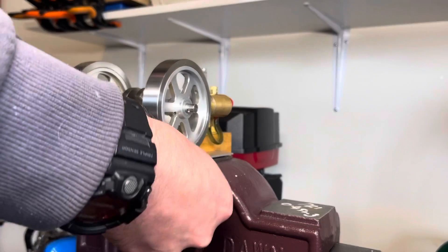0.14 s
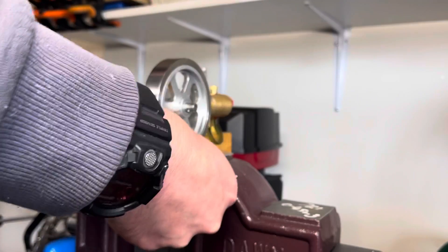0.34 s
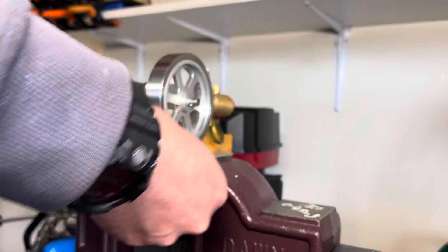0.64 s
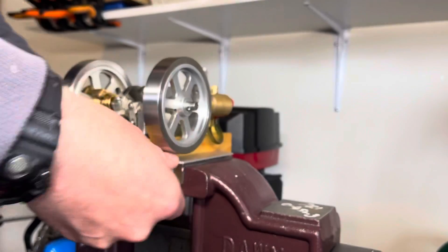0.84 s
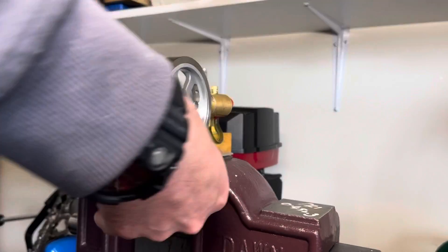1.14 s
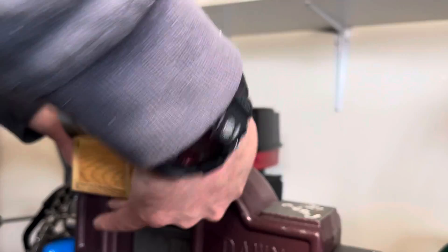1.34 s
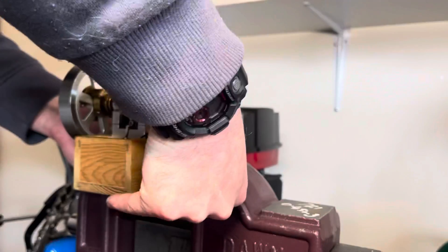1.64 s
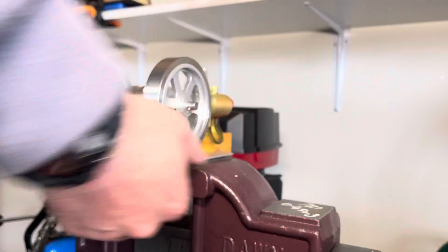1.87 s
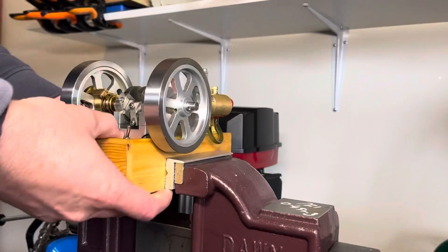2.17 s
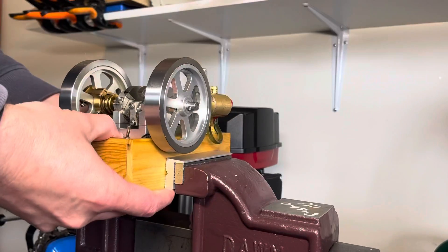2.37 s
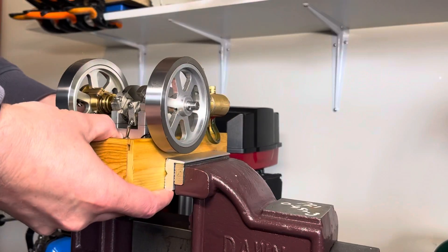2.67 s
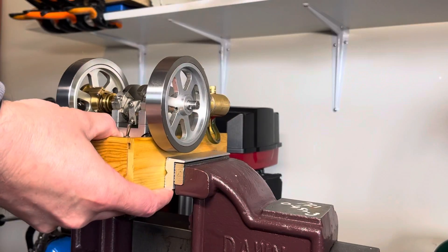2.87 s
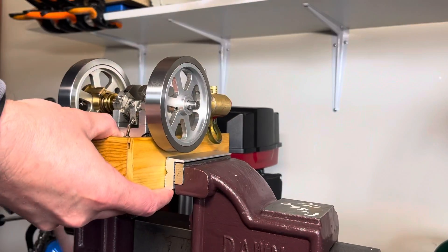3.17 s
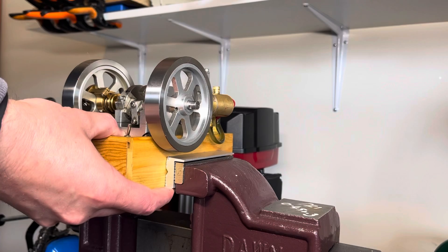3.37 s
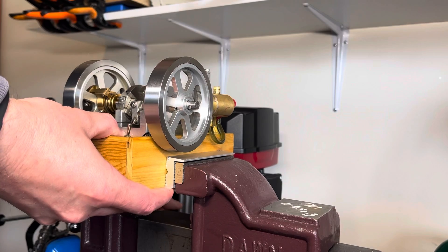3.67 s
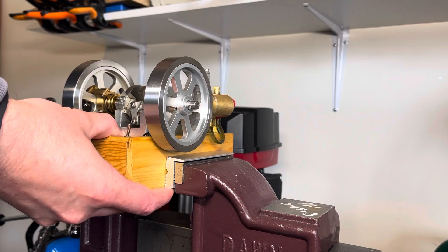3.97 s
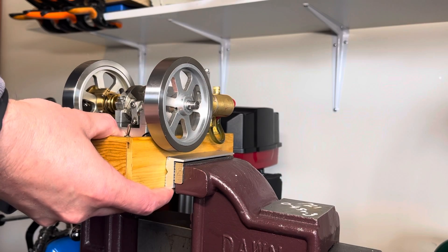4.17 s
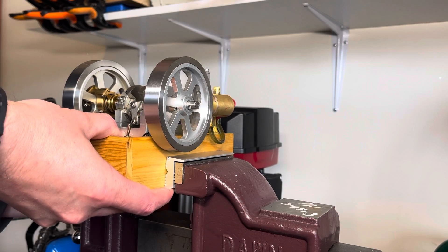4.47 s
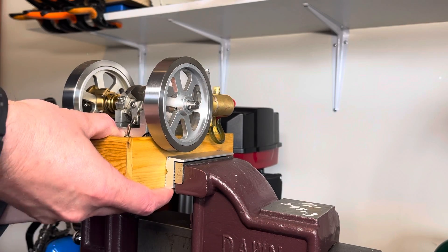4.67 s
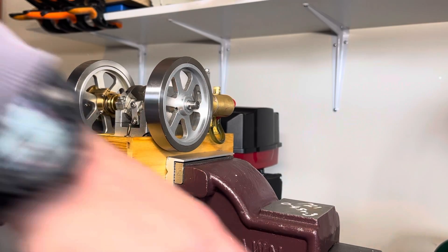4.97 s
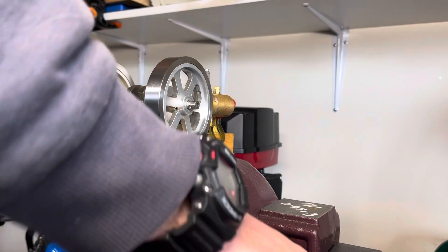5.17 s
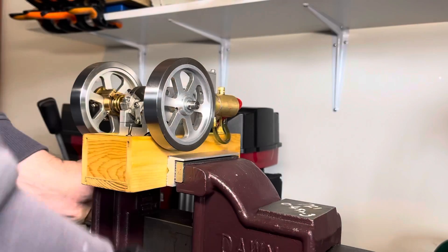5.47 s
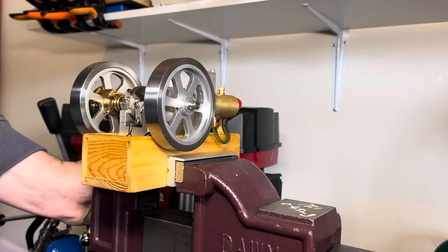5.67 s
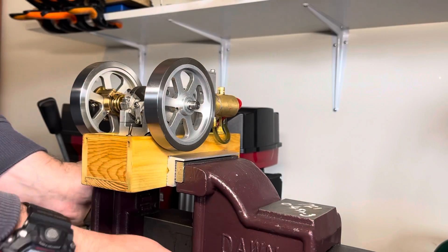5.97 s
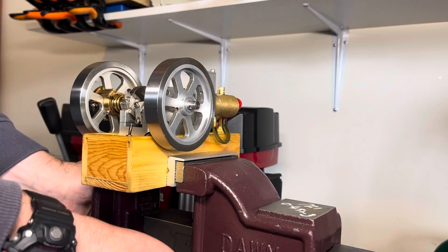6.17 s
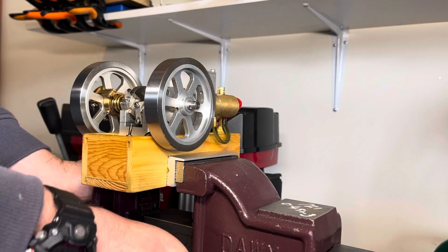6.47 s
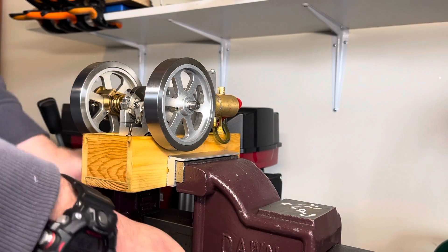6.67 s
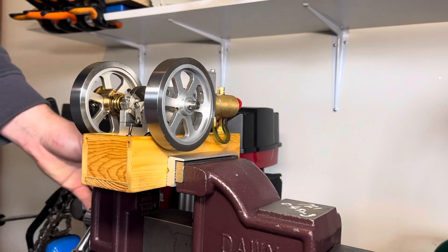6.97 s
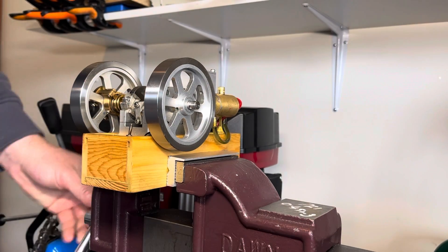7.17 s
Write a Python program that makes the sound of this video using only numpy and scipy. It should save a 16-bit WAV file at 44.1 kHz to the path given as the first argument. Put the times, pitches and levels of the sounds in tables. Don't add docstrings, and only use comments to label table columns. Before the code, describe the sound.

Close stereo sound in a small, dry workshop with faint air noise. From 0 to 1.3 s, hands and sleeves rub in short strokes, the bench bumps softly, a light tap comes at 0.3 and dull touches near 1.0 and 1.2; a flywheel rings almost inaudibly. Around 1.9-2.8 s there are small metallic ticks, light taps and brief wood drags. At 3.05 s the wooden base cracks onto the steel jaws, then deep bench thumps follow at 3.2-3.35. A quiet stretch leads to a tiny latch snap at 4.4, hollow knocks at 4.75-4.8 and a dull one at 4.94. Jaws bite in quick jerks at 5.1; scuffs and ticks follow, with a heavy low bounce at 5.5 and faint creaks until 6.1. After a lull, the steel bar drops at 6.68, then from 6.84 grinds, jolts and chatters brightly, squealing around 7.1, landing at 7.3.

```python
import sys
import numpy as np
from scipy import signal
from scipy.fft import rfft, irfft, next_fast_len
from scipy.io import wavfile
from scipy.ndimage import uniform_filter1d

SR = 44100
rng = np.random.default_rng(int(sys.argv[2]) if len(sys.argv) > 2 else 0)


def put_to_file(sound):
    columns = np.atleast_2d(sound).T
    safe = np.clip(columns, -1, 1)
    whole_steps = np.round(safe * 32767)
    wavfile.write(sys.argv[1], SR, whole_steps.astype(np.int16))


def to_linear_factor(level_db):
    exponent = np.asarray(level_db, float) / 20
    return 10 ** exponent


N = 323252

# pitch [Hz], likeness [0 to 1].
LIKENESS = [(50, 0.96), (130, 0.86), (270, 0.78), (600, 0.16), (1500, 0.13), (3000, 0.071), (6000, 1),
            (12000, 0.85)]
# pitch [Hz], width [Hz], level [dB].
BENCH_FRAME = [(53, 17.3, 2), (81.5, 20, -1.5)]
# pitch [Hz], width [Hz], level [dB].
BENCH_PANEL = [(126, 14, 2.5), (147, 21, 2), (197, 28, -12), (225.7, 59, -0.5)]
# pitch [Hz], width [Hz], level [dB].
WOOD_MID = [(720, 70, -3), (860, 60, 0), (990, 80, -2), (1230, 80, 0)]
# pitch [Hz], width [Hz], level [dB].
STEEL_LOW = [(212, 26, -23), (270, 27, -2.5), (361, 11, -11), (409, 62, -10.5), (715, 15, -7),
             (802, 190, -13.5), (869.4, 13, -5), (1045, 33, -9)]
# pitch [Hz], width [Hz], level [dB].
STEEL_HIGH = [(1508, 30, -6), (1595, 38, 2.5), (1810, 53, 4.5), (2002, 18, -3), (2074, 80, 1),
              (2175, 9.1, -4.5), (2460, 63, -6.5), (2731, 18, -6), (3025, 116, -7), (3412, 70, -1),
              (4570, 89, -11), (5010, 230, -22), (5930, 70, -24), (6200, 3700, -24.5)]
DRAG_RISE_DB_PER_S, DRAG_FALL_DB_PER_S = 696.5, 264


def rms_one(x):
    return x / np.sqrt(np.mean(x ** 2) + 1e-20)


def at_hz(points, hz):
    curve = np.array(points)
    return np.interp(np.log(hz), np.log(curve[:, 0]), curve[:, 1])


def in_time(*tables):
    s, *columns = np.transpose(np.concatenate(tables))
    t = np.arange(N) / SR
    return [to_linear_factor(np.interp(t, s, c, left=-120, right=-120)) for c in columns]


def drift(per_s):
    return np.interp(np.arange(N) * per_s / SR, np.arange(500), rng.standard_normal(500))


def efforts(rows, rise_db_per_s, fall_db_per_s):
    t = np.arange(0, N + 40, 40) / SR
    power = 0
    for start, hold, *db in rows:
        before = (start - t).clip(0)
        after = (t - start - hold).clip(0)
        power = power + to_linear_factor(np.c_[db] - rise_db_per_s * before - fall_db_per_s * after) ** 2
    return np.array([np.interp(np.arange(N) / SR, t, gain) for gain in np.sqrt(power)])


def spread(pair, hz):
    alike = np.clip(at_hz(LIKENESS, hz), 0, 1)
    return np.sqrt((1 + alike) / 2) * pair[0] + np.sqrt((1 - alike) / 2) * pair[1] * [[1], [-1]]


def resonate(x, hz, width_hz):
    r = np.exp(-np.pi * width_hz / SR)
    w = 2 * np.pi * hz / SR
    return signal.lfilter([0, np.sin(w)], [1, -2 * r * np.cos(w), r * r], x + 1e-18)


def voice(pair, hz, wide, turn):
    mid, side = resonate(pair, hz, wide)
    late = np.roll(mid, int(SR / hz / 4))
    return spread([mid, 0.65 * side + 0.55 * turn * late], hz)


def grains(per_s, uneven_db):
    sizes = to_linear_factor(uneven_db * np.minimum(rng.exponential(1, (2, N)), 5))
    sizes = sizes * rng.choice([-1, 1], (2, N))
    return rms_one(sizes * (rng.random((2, N)) < per_s / SR))


def rubbed(slips, modes, gain, wander_db, wander_per_s=10, near_hz=None):
    hz, wide, db = np.transpose(modes)
    shares = np.array([to_linear_factor(level + wander_db * drift(wander_per_s)) for level in db])
    shares *= np.sqrt(np.c_[wide])
    if near_hz is not None:
        octaves = np.log2(np.c_[hz] / near_hz)
        shares *= to_linear_factor(8.5 * np.exp(-(octaves / 0.086) ** 2))
    shares /= np.sqrt(np.sum(shares ** 2, axis=0))
    even = np.sqrt(4 * np.pi * wide / SR)
    out = 0
    for k in range(len(hz)):
        own = np.roll(slips, k * 777, axis=1)
        out = out + voice(own * gain * shares[k] * even[k], hz[k], wide[k], (-1) ** k)
    return out


def banded(pair, spectrum, patchy_db=0):
    bottom, top = spectrum[0][0], spectrum[-1][0]
    edges = np.geomspace(bottom, top, int(2 * np.log2(top / bottom)) + 3)
    out = 0
    for k, (low, high) in enumerate(zip(edges, edges[1:])):
        middle = np.sqrt(low * high)
        sos = signal.butter(2, [low, high], "band", fs=SR, output="sos")
        band = signal.sosfilt(sos, np.roll(pair, k * 999, axis=1))
        out = out + to_linear_factor(at_hz(spectrum, middle) + patchy_db * drift(9.2)) * spread(band, middle)
    return rms_one(out)


def strike(s, levels_db, modes, soft_hz, contact_s, click=.55):
    out, at = 0, np.round(np.asarray(s) * SR).astype(int)
    soft = signal.butter(2, soft_hz, fs=SR)
    fade = np.exp(-1 / (contact_s * SR))
    rattle = grains(8000, 1.5) * np.sqrt(1 - fade ** 2)
    for k, (hz, wide, db) in enumerate(modes):
        clicks = np.zeros(N)
        clicks[at] = to_linear_factor(levels_db + db + 2.5 * rng.standard_normal(len(at)))
        contact = 1.1 * signal.lfilter([1], [1, -fade], clicks + 1e-18) * rattle + click * clicks
        out = out + voice(signal.lfilter(*soft, contact), hz, wide, (-1) ** k)
    return out


def struck(rows, modes):
    out = np.zeros((2, N + SR))
    for s, db, tilt in rows:
        i = round(s * SR)
        for hz, level, t60 in modes:
            t = np.arange(int(min(t60, .9) * SR)) / SR
            luck, left, right = rng.standard_normal(3)
            lean = np.c_[[left, right]] * (1 - np.clip(at_hz(LIKENESS, hz), 0, 1))
            ring = np.sin(2 * np.pi * hz * t + lean) * np.minimum(2 * t * hz, 1)
            decay = to_linear_factor(db + level + tilt * np.log2(hz / 1000) + 1.5 * luck - 60 * t / t60)
            out[:, i:i + len(t)] += ring * decay
    return out[:, :N]


def burst(s, db, hz, t60, ring_share, overtone=0):
    t = np.arange(int(.16 * SR)) / SR
    band = signal.butter(2, [hz * 0.57, min(hz * 2.94, 10500)], "band", fs=SR)
    noise = rms_one(signal.lfilter(*band, rng.standard_normal((2, len(t)))))
    crack = spread(noise, hz) * (to_linear_factor(-60 * t / 0.016) + 0.22 * to_linear_factor(-60 * t / 0.17))
    ring = np.sin(2 * np.pi * hz * t) + .5 * np.sin(2 * np.pi * overtone * hz * t)
    ring = ring * to_linear_factor(-60 * t / t60)
    out = (ring_share * ring + (1 - ring_share) * crack) * to_linear_factor(db) * np.minimum(t / 0.0007, 1)
    i = round(s * SR)
    return slice(i, i + len(t)), out[:, :N - i]


def bursts(rows, cycles, ring_share, overtone=1.3):
    out = np.zeros((2, N))
    for s, db, hz in rows:
        where, sound = burst(s, db, hz, cycles / hz, ring_share, overtone)
        out[:, where] += sound
    return out


def knocks():
    # start in seconds, body peak in dB, bench thud over it in dB, hardness in dB.
    dull = [
        (1.023, -48.5, -13, -42),
        (1.243, -47, 3, -1),
        (3.203, -41, -5, -5),
        (3.356, -50.5, 14, -5),
        (4.94, -38.5, -0.5, -2.5),
        (5.521, -61, 10, -12),
        (6.629, -46.5, -24, -12),
    ]
    hollow = [
        (.296, -53.5, -4, 12),
        (1.131, -64.5, 12, 18),
        (4.764, -41.5, -26, -21),
        (4.776, -48, -15, 9),
        (4.797, -38, -19, 6.5),
    ]
    sharp = [
        (1.94, -59.5, 10, -26),
        (3.048, -35.5, 0, 9),
    ]
    dull_db = (-21.5, -28, -22)
    hollow_db = (0, -11, -34.5)
    sharp_db = (-15, -7.5, -24)
    hard_gain = (0.17, 0.55, 1.63)
    # pitch in Hz, width in Hz, level in dB.
    wood_body = [(340, 50, -2), (430, 45, 0), (540, 70, -4)]
    # pitch in Hz, width in Hz, level in dB.
    wood_high = [(1600, 90, 0), (1760, 100, -1), (2150, 110, 0), (2800, 130, -1)]
    s, db, thud, hard = np.transpose(dull + hollow + sharp)
    kind = [dull_db] * len(dull) + [hollow_db] * len(hollow) + [sharp_db] * len(sharp)
    mid, high, crack = np.transpose(kind) + np.outer(hard_gain, hard)
    wood = strike(s, db - 2.5, wood_body, soft_hz=1400, contact_s=0.0066)
    wood += strike(s, db + mid, WOOD_MID, soft_hz=2500, contact_s=.003)
    wood += strike(s, db + high + 3, wood_high, soft_hz=4500, contact_s=.004)
    for at, level in zip(s, db + crack):
        where, sound = burst(at, level + 7.0, 2500, .02, ring_share=0.018)
        wood[:, where] += sound
    thuds = strike(s, db + thud - 8.5, BENCH_FRAME + BENCH_PANEL, soft_hz=596, contact_s=0.00045)
    return wood, thuds


def seating():
    # start in seconds, peak in dB, tilt in dB per octave.
    blows = [
        (3.0445, -37.5, -3.5),
        (3.047, -38.5, 1.5),
        (3.051, -46, -8.5),
        (3.064, -59, -4),
        (3.126, -58, -4),
    ]
    # pitch in Hz, level in dB, t60 in seconds.
    seated = [(123, -20.5, .12), (217, -3.5, 0.25), (429, 5.5, 0.048), (810, -4.5, 0.04), (1006, -4, 0.037),
              (1274, 2, 0.046), (1772, -0.5, 0.091), (2310, 1.5, 0.048), (2880, -19, .05),
              (3770, -6, 0.036), (4350, -14, 0.031), (4980, -6, 0.04), (8300, -10, 0.038)]
    return struck(blows, seated)


def gripping():
    # start in seconds, peak in dB, tilt in dB per octave.
    jerks = [
        (5.074, -45, -1.5),
        (5.087, -43.5, -4.5),
        (5.0935, -39, 1.5),
        (5.099, -36, 2.5),
        (5.11, -40, 5.5),
        (5.122, -44.5, -5.5),
        (5.155, -47.5, -7),
    ]
    # pitch in Hz, level in dB, t60 in seconds.
    gripped = [(184, -6.5, 0.25), (338, 3, 0.082), (915, -5, 0.074), (1500, 4.5, 0.027), (1690, -1, 0.051),
               (2067, -0.5, 0.054), (2170, -11, 0.055), (2630, -16.5, 0.099), (2750, -9.5, 0.096),
               (2910, -12.5, 0.073), (3560, -22, .06)]
    return struck(jerks, gripped)


def latch():
    # start in seconds, peak in dB, tilt in dB per octave.
    snaps = [
        (4.3853, -48, 0),
        (4.388, -56, 0),
    ]
    # pitch in Hz, level in dB, t60 in seconds.
    latch_modes = [(1300, -9, 0.023), (2025, -21, .07), (3180, -7, 0.032), (4017, 1, 0.044),
                   (4080, -7.5, 0.084), (4400, -10, 0.04), (5570, -14, 0.081), (7360, -4, 0.044),
                   (7560, 9, 0.02), (8670, -3.5, 0.037)]
    return struck(snaps, latch_modes)


def edge_taps():
    # start in seconds, peak in dB, tilt in dB per octave.
    taps = [
        (2.584, -46, -4.5),
        (2.6925, -53.5, -7),
        (3.1, -60, -3),
        (5.652, -63, -14),
        (1.4, -63, -7),
    ]
    # pitch in Hz, level in dB, t60 in seconds.
    edge_modes = [(460, -3, 0.054), (865, -11, 0.037), (1163, 2.5, 0.038), (1300, -6, 0.047),
                  (1770, -11, 0.023), (2500, -15.5, 0.041)]
    return struck(taps, edge_modes)


def rocking():
    # start in seconds, peak in dB, tilt in dB per octave.
    rocks = [
        (3.203, -23, 3.5),
        (3.215, -41.5, -2.5),
        (3.2505, -20, 8),
        (3.264, -49.5, -2.5),
        (3.32, -66, 1),
        (5.521, -23, 7.5),
        (5.535, -44, -2),
        (5.6, -37, 5),
        (4.942, -34, 8),
    ]
    # pitch in Hz, level in dB, t60 in seconds.
    bench_top = [(60.8, 4, 0.29), (76.7, -0.5, 0.26), (139.4, 0, 0.11), (226, -7.5, 0.12), (286, -13, 0.11),
                 (347, -6, 0.068), (441, -14.5, 0.092)]
    return struck(rocks, bench_top)


def handling():
    # start in seconds, peak in dB, pitch in Hz.
    touches = [(.262, -55, 2080), (1.57, -70, 2290), (1.66, -74, 2400), (1.75, -68, 2300),
               (4.777, -37, 849), (4.812, -41.5, 810), (4.832, -51, 867), (4.941, -45, 898),
               (5.642, -42, 680), (5.689, -42.5, 844), (5.706, -50, 875), (6.07, -52, 226.7),
               (6.145, -61, 505)]
    return bursts(touches, cycles=70, ring_share=0.92)


def settling():
    # start in seconds, peak in dB, pitch in Hz.
    light_taps = [
        (1.958, -58, 2130),
        (1.991, -60, 3150),
        (2.114, -50, 1196),
        (2.157, -54, 710),
        (5.52, -36, 229.4),
        (5.0, -51, 850),
        (5.73, -53, 895),
    ]
    # start in seconds, hold in seconds, level in dB.
    creaks = [
        (5.73, .03, -67.5),
        (5.85, .22, -73.5),
    ]
    # pitch in Hz, width in Hz, level in dB.
    creak_rings = [(1095, 87, -5), (1840, 29, -3)]
    effort = efforts(creaks, DRAG_RISE_DB_PER_S, DRAG_FALL_DB_PER_S)[0]
    creaking = rubbed(grains(2000, 2.9), creak_rings, effort, wander_db=9.0)
    return creaking + bursts(light_taps, cycles=40.0, ring_share=1.0, overtone=1.5)


def bar_slide():
    # time in seconds, pressure as grind in dB, speed as bite in dB.
    bar_motion = [
        [(6.655, -52, -100), (6.68, -34.5, -48.5), (6.798, -49, -58.5), (6.83, -42, -45.5)],
        [(6.843, -36, -42.5), (6.929, -38.5, -46.5), (7.03, -38.5, -43), (7.05, -39.5, -32),
         (7.156, -33.5, -29.5), (7.19, -34, -36), (7.25, -32, -36), (7.29, -41, -52), (7.33, -42, -68)],
    ]
    # time in seconds, pitch of the loudest modes in Hz.
    bearing_points = [(6.84, 1600), (6.88, 1840), (6.96, 1900), (7.06, 2010), (7.12, 2010), (7.15, 1740),
                      (7.2, 1600), (7.26, 1470), (7.33, 1500)]
    grind, bite = in_time(*bar_motion)
    bearing = np.interp(np.arange(N) / SR, *np.transpose(bearing_points))
    slide = rubbed(grains(1500, 3.05), STEEL_LOW, grind, wander_db=5.5, wander_per_s=30, near_hz=bearing / 2)
    ragged_bite = bite * to_linear_factor(2.0 * drift(45))
    slide += rubbed(grains(2000, 2.84), STEEL_HIGH, ragged_bite, wander_db=5.5, wander_per_s=35,
                    near_hz=bearing)
    return signal.sosfilt(signal.butter(2, 8600, fs=SR, output="sos"), slide)


def bar_jolts():
    # start in seconds, peak of the high modes in dB, peak of the low modes in dB.
    jolts = [
        (6.6777, -31.5, -26),
        (6.8448, -22.5, -36),
        (6.891, -20.5, -36),
        (6.9708, -22, -25),
        (7.0005, -21.5, -41),
        (7.0473, -32, -31),
        (7.141, -31, -40),
        (7.191, -26.5, -23),
        (7.2517, -18, -29),
    ]
    # start in seconds, peak in dB.
    landing = (7.3045, -27)
    s, db, low_db = np.transpose(jolts)
    out = strike(s, db - 16.5, STEEL_HIGH, soft_hz=3000, contact_s=0.016, click=.2)
    out += strike(s, low_db - 19.0, STEEL_LOW[4:], soft_hz=1500, contact_s=0.01, click=0.15)
    return out + strike([landing[0]], landing[1], STEEL_LOW[1:3], soft_hz=496, contact_s=0.0062)


def bar_squeal():
    # start in seconds, hold in seconds, level in dB.
    catches = [
        (6.86, 0.2, -64),
        (7.045, 0.073, -44),
    ]
    # pitch in Hz, width in Hz, level in dB.
    squeal_modes = [(8160, 68, 16), (8380, 90, -11)]
    squeal = efforts(catches, rise_db_per_s=599, fall_db_per_s=356)[0]
    whistle = rubbed(grains(3000, 4.6), squeal_modes, squeal, wander_db=-4.0, wander_per_s=30)
    whistle *= to_linear_factor(1.6 * drift(44))
    return signal.sosfilt(signal.butter(2, [7900, 8700], "band", fs=SR, output="sos"), whistle)


def song(rows):
    s, hz, db = np.transpose(rows)
    pitch = np.interp(np.arange(N) / SR, s, hz) * (1 + .003 * drift(60))
    phase = 2 * np.pi * np.cumsum(pitch) / SR
    flutter = to_linear_factor(2.0 + 4.5 * drift(65))
    gain = uniform_filter1d(in_time(np.c_[s, db])[0], size=200) * flutter
    return gain * spread([np.sin(phase), -np.cos(phase)], hz[0])


def bar_songs():
    # time in seconds, pitch in Hz, level in dB.
    song_high = [
        (7.04, 8280, -60),
        (7.088, 8300, -34.5),
        (7.325, 8200, -68),
    ]
    song_mid = [
        (7.065, 4250, -49),
        (7.105, 4280, -42.5),
        (7.3, 4200, -63.5),
    ]
    song_low = [
        (6.83, 832, -46.5),
        (7.008, 929, -41),
        (7.27, 817, -39),
    ]
    return to_linear_factor(-1.0) * song(song_high) + song(song_mid) + song(song_low)


def bar_chatter():
    # start in seconds, peak in dB, pitch in Hz.
    contacts = [(6.668, -44, 1097), (6.677, -31.5, 890), (6.692, -39, 1063), (6.715, -35, 1000),
                (6.8445, -23, 1607), (6.851, -25.5, 1630), (6.893, -31.5, 2050), (6.971, -30, 998),
                (6.98, -31, 1040), (7.0, -33, 894), (7.053, -27, 2040), (7.081, -24, 3440),
                (7.11, -33, 2060), (7.14, -35, 1810), (7.187, -30, 2050), (7.19, -35, 768),
                (7.215, -36.5, 760), (7.254, -25, 1440), (7.303, -32, 1550)]
    return bursts(contacts, cycles=63, ring_share=0.91)


def dragging():
    # start in seconds, hold in seconds, level in dB.
    drags = [(0, 0.084, -60), (.3, 0.025, -58.5), (.37, 0.0051, -50), (.64, 0.11, -70),
             (1.14, 0.094, -68.5), (1.24, 0.016, -78), (1.95, 0.013, -66), (2.11, 0.054, -61.5),
             (2.4, 0.11, -55.5), (2.7, 0.054, -59.5), (3.07, 0.15, -50), (3.205, 0.015, -43.5),
             (2.345, 0.046, -61.5), (3.35, 0.054, -63), (3.51, 0.018, -66.5), (3.73, 0.018, -60),
             (4.41, 0.039, -71), (4.78, 0.042, -44), (4.945, 0.029, -48.5), (5.1, 0.0064, -41.5),
             (5.3, 0.12, -50), (5.52, 0.012, -57), (5.64, 0.12, -50.5), (6.05, 0.012, -65),
             (6.14, 0.045, -67)]
    # start in seconds, hold in seconds, level in dB.
    scuffs = [
        (2.595, 0.01, -79),
        (2.7, 0.017, -79),
        (4.78, 0.034, -56.5),
        (5.3, 0.034, -55.5),
        (5.64, 0.084, -57.5),
    ]
    # pitch in Hz, width in Hz, level in dB.
    jaw_pads = [(301, 66, 6), (440, 39, 5.5), (704, 120, -5.5), (850, 520, -9.5)]
    drag = efforts(drags, DRAG_RISE_DB_PER_S, DRAG_FALL_DB_PER_S)[0] * to_linear_factor(2.0 * drift(60))
    scuff = efforts(scuffs, DRAG_RISE_DB_PER_S, DRAG_FALL_DB_PER_S)[0]
    wood = rubbed(grains(1800, 2.88), jaw_pads, drag, wander_db=3.0)
    return wood + rubbed(grains(900, 3.9), WOOD_MID, scuff, wander_db=4.0)


def skin_and_sleeve():
    # start in seconds, hold in seconds, coarse level in dB, fine level in dB.
    strokes = [(0, 0.053, -54, -60.5), (.285, 0.006, -61.5, -80), (.355, 0.038, -48.5, -49.5),
               (.63, 0.084, -54, -58.5), (1.95, 0.11, -77, -76), (2.118, 0.0065, -64.5, -59.5),
               (2.38, 0.13, -72.5, -92), (2.77, 0.0078, -64, -90), (3.065, 0.018, -56.5, -68),
               (3.2, 0.017, -66, -81), (3.5, 0.023, -69, -74.5), (3.73, 0.031, -76.5, -89),
               (4.41, 0.024, -72, -71.5), (4.73, 0.13, -61, -66), (4.95, 0.043, -72, -74),
               (5.1, 0.0088, -45.5, -64), (5.3, 0.067, -63, -102), (5.64, 0.058, -76, -80),
               (5.81, 0.043, -71, -82), (5.88, 0.069, -69, -72.5), (6.0, 0.097, -76, -76),
               (6.615, 0.011, -71, -71), (6.68, 0.086, -59, -55.5)]
    # time in seconds, level in dB.
    fidget = [(0, -74), (.23, -126), (1.69, -87.5), (1.96, -72), (2.065, -84), (2.1, -61.5), (2.25, -79.5),
              (2.5, -99), (3.02, -78.5), (3.13, -72), (3.6, -108), (4.3, -80.5), (4.7, -85), (4.9, -77),
              (5.25, -66.5), (5.6, -74), (5.95, -80), (6.15, -78.5), (6.3, -100)]
    # pitch in Hz, width in Hz, level in dB.
    skin_modes = [(1300, 240, 1), (1650, 220, -2), (2250, 400, -7), (2950, 280, -3)]
    # pitch in Hz, level in dB per Hz.
    fine_spectrum = [(1760, -27.5), (3000, -25), (4180, -4.5), (4800, -20), (9120, -15), (10100, -25),
                     (11200, -7), (12400, -31), (22000, -120)]
    # pitch in Hz, level in dB per Hz.
    rustle_spectrum = [(1760, -33), (3000, -3), (5980, -6), (6730, -14.5), (9280, 4.5), (11200, -0.5),
                       (12400, -10.5), (22000, -120)]
    ragged_grip = to_linear_factor(0.89 * drift(43))
    rough, fine = efforts(strokes, rise_db_per_s=602, fall_db_per_s=339) * ragged_grip
    rustle = in_time(fidget)[0] * to_linear_factor(1.4 * drift(9.3) + 4.0 * drift(60))
    skin = rubbed(grains(2500, 3.3), skin_modes, rustle * to_linear_factor(-2) + rough, wander_db=4.0)
    skin = signal.sosfilt(signal.butter(2, 1000, "high", fs=SR, output="sos"), skin)
    hiss = grains(12000, 3.1)
    return skin + fine * banded(hiss, fine_spectrum) + rustle * banded(hiss, rustle_spectrum, patchy_db=3.5)


def bench():
    # start in seconds, hold in seconds, deep shake in dB, panel shake in dB.
    pushes = [(0, 0.029, -45, -53.5), (.12, 0.044, -62, -65.5), (.31, 0.12, -52, -52),
              (.46, 0.05, -54.5, -59), (.65, 0.095, -52, -58.5), (.76, 0.0068, -52.5, -73),
              (1.05, 0.008, -49, -61), (1.13, 0.058, -44, -61.5), (1.27, 0.051, -58.5, -62.5),
              (1.52, 0.011, -56.5, -66.5), (1.77, 0.0075, -52, -61.5), (1.97, 0.036, -48.5, -58),
              (2.1, 0.08, -54.5, -57.5), (2.4, 0.2, -60.5, -60), (2.56, 0.034, -56, -62),
              (2.74, 0.042, -55, -59.5), (3.07, 0.033, -41, -44.5), (3.225, 0.045, -52, -38.5),
              (3.33, 0.034, -44, -52), (3.52, 0.08, -46.5, -59.5), (3.76, 0.082, -43, -63.5),
              (4.8, 0.066, -45, -47.5), (4.95, 0.064, -58, -44.5), (5.12, 0.023, -50, -42),
              (5.25, 0.4, -48.5, -51.5), (5.53, 0.026, -62, -41), (5.63, 0.24, -63, -61),
              (6.05, 0.11, -59, -61), (6.3, 0.0051, -58.5, -59.5), (6.69, 0.87, -55.5, -51)]
    deep, panel = efforts(pushes, rise_db_per_s=501, fall_db_per_s=163.5)
    shake = rubbed(grains(400, 4.0), BENCH_FRAME, deep, wander_db=0.0)
    shake += rubbed(grains(300, 3.2), BENCH_PANEL, panel, wander_db=6.0)
    return signal.sosfilt(signal.butter(2, 420, fs=SR, output="sos"), shake)


def ticks():
    # start in seconds, peak in dB, pitch in Hz.
    metal_ticks = [(.2605, -50, 1300), (1.867, -57, 4460), (1.9, -63, 2500), (2.03, -55, 3220),
                   (2.09, -46, 1200), (2.762, -49, 2110), (2.775, -50.5, 3500), (1.9607, -58, 4530),
                   (1.9914, -56, 2940), (2.4184, -58, 2530), (2.4975, -59, 2920), (3.491, -60, 3130),
                   (3.5927, -61, 3850), (3.7956, -52.5, 4240), (4.7316, -35.5, 3000), (5.2935, -44, 4180),
                   (3.311, -61.5, 4400), (5.525, -59, 3380), (4.7956, -64, 3640)]
    strap_ticks = [(.2627, -54, 6840), (2.0898, -39, 9100), (2.117, -37.5, 10800), (2.1594, -45, 9700),
                   (2.761, -44, 9100), (2.7722, -40, 8880), (4.848, -35, 8470), (5.202, -36.5, 11700),
                   (4.7283, -42, 8600), (5.2107, -50, 7440), (5.2606, -32, 8250), (5.17, -52, 9400),
                   (5.43, -65, 8600), (5.4411, -52.5, 5960), (6.011, -57, 9180), (6.1785, -59, 7850),
                   (5.3298, -38, 8300), (6.4514, -56.5, 8360)]
    clinks = [
        (2.2443, -46.5, 9420),
        (4.574, -71, 3750),
        (4.574, -77.5, 1960),
        (6.676, -38, 9120),
    ]
    out = bursts(metal_ticks, cycles=62, ring_share=0.5)
    out += bursts(strap_ticks, cycles=67, ring_share=0.81)
    return out + bursts(clinks, cycles=250, ring_share=1)


def flywheel():
    # start in seconds, peak in dB, pitch in Hz.
    rings = [
        (0.736, -69.5, 4590),
        (1.216, -69, 4590),
        (1.915, -73.5, 4560),
    ]
    out = np.zeros((2, N))
    for s, db, hz in rings:
        where, sound = burst(s, db, hz, 1.0, ring_share=.97)
        size = sound.shape[1]
        fade_out = np.hanning(2 * size)[size:]
        out[:, where] += sound * fade_out * np.minimum(np.arange(size) / 400, 1)
    return out


def shop(x):
    t60_s, wall_cut_hz = 0.089, 2000
    size = next_fast_len(N + SR)
    w = 2 * np.pi * np.arange(size // 2 + 1) / size
    dull = np.exp(-2 * np.pi * wall_cut_hz / SR)
    wall = (1 - dull) / (1 - dull * np.exp(-1j * w))
    out = np.zeros((2, len(w)), complex)
    for k, lag in enumerate((rng.uniform(0.0087, 0.028, 12) * SR).astype(int)):
        loop = to_linear_factor(-60 * lag / SR / t60_s) * wall * np.exp(-1j * w * lag)
        out[k % 2] += loop / (1 - loop) * (-1) ** (k // 2)
    return irfft(out * rfft(x.mean(axis=0), size), size)[:, :N]


def room_air():
    # pitch in Hz, level in dB per Hz.
    air_spectrum = [(18, -34.5), (30, 2.5), (76, -3.5), (262, -14.5), (505, -23), (3260, -35.5),
                    (6950, -39.5), (8730, -36), (10200, -30), (11200, -36), (12400, -66.5), (22000, -120)]
    return to_linear_factor(-70.5) * banded(rng.standard_normal((2, N)), air_spectrum)


def scene():
    wood, thuds = knocks()
    bodies = seating() + gripping() + latch() + edge_taps() + rocking()
    hits = wood + bodies + handling() + bar_chatter() + ticks() + flywheel()
    hands_and_bench = thuds + bench() + dragging() + skin_and_sleeve()
    handle_bar = bar_slide() + bar_jolts() + bar_squeal() + bar_songs()
    close = hits + hands_and_bench * to_linear_factor([[-.7], [.7]]) + handle_bar * to_linear_factor([[.6], [-.6]])
    return close + settling() + to_linear_factor(-1) * shop(hits) + room_air()


def band_limit(x):
    return signal.sosfilt(signal.butter(12, 12570, fs=SR, output="sos"), x)


def record(dry):
    notch_hz, cutoff_hz = 10150, 12820
    x = np.array([dry[0], np.r_[0, dry[1, :-1]]])
    x = signal.sosfilt(signal.butter(6, 45, "high", fs=SR, output="sos"), x)
    notch = signal.butter(2, [notch_hz - 480, notch_hz + 480], "bandstop", fs=SR, output="sos")
    x = signal.sosfilt(notch, x)
    x = signal.sosfilt(signal.cheby2(10, 50, cutoff_hz, fs=SR, output="sos"), x)
    x = x * np.minimum(np.arange(N)[::-1] / 150, 1)
    return band_limit(x)


dry = scene()
out = record(dry)
put_to_file(out)
```